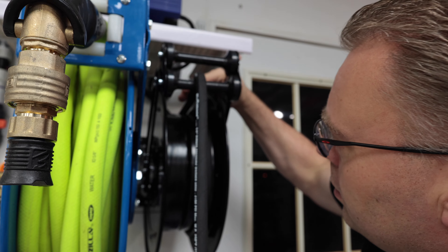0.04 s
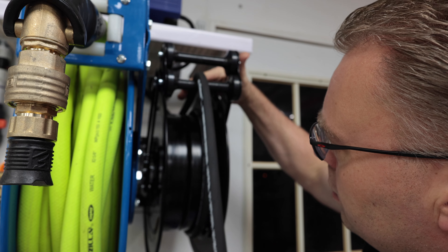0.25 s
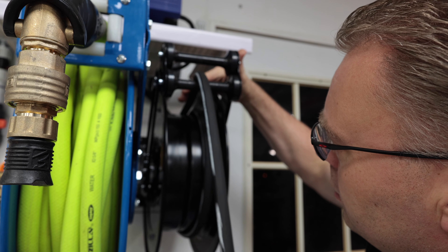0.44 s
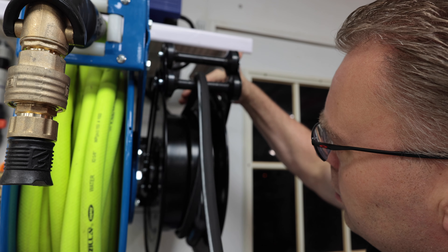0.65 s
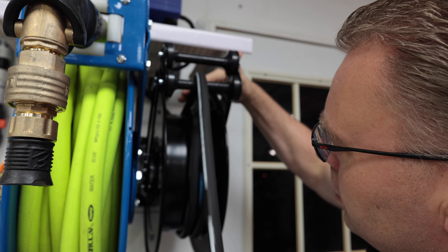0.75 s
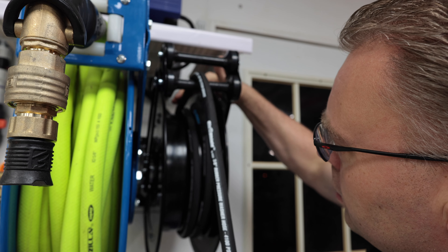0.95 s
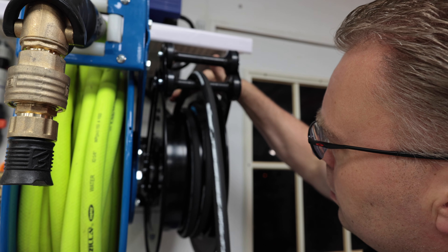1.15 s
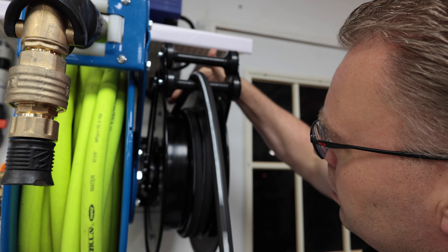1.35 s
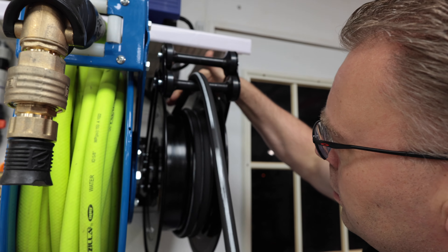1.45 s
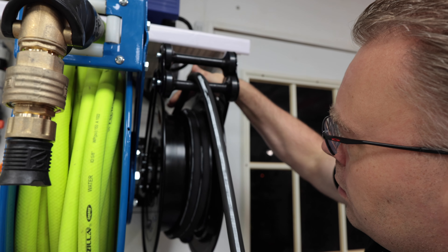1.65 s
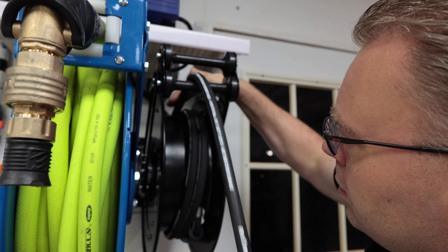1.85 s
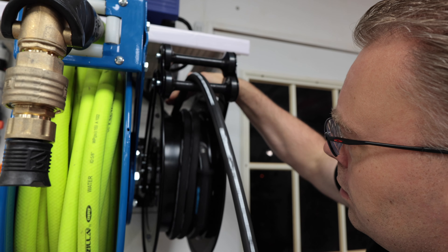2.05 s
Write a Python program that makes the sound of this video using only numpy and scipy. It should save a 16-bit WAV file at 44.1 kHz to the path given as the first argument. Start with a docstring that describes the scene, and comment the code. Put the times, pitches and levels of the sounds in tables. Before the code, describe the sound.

A hose reel ratchets in three quick runs of metallic clicks as it is tugged. The hose rubs and squeaks in its guide, the wall mount thuds, and a low rumble bumps the close microphone in a garage.

```python
"""Ratcheting hose reel

A spring hose reel on a garage wall is pulled in three tugs. Its pawl bounces over the ratchet teeth and
excites the modes of steel latch, drum and side plate; the hose rubs and squeaks in the guide; the mount
thuds. A close microphone also gets a low rumble, rounds the peaks and drops out briefly near the end."""
import sys
import numpy as np
from scipy import signal
from scipy.fft import rfft, irfft
from scipy.io import wavfile
from scipy.ndimage import uniform_filter1d

SR = 44100
rng = np.random.default_rng(int(sys.argv[2]) if len(sys.argv) > 2 else 0)


def output_pcm(signal):
    """Save a mono or channel-first signal as 16-bit PCM at the path in sys.argv[1].

    Samples are clipped to [-1, 1] before scaling.
    """
    pcm = np.clip(np.atleast_2d(signal).T, -1, 1) * 32767
    wavfile.write(sys.argv[1], SR, np.round(pcm).astype(np.int16))


N = 92610

# modes of latch, drum and side plate: pitch_hz, gain_db, t60_s
LATCH_MODES = [(1000, -6, .04), (1965, -8, .06), (2113, -7, .06), (2340, -4, .06), (2500, -10, .04),
               (2796, -5, .06), (2975, -5, .05), (3202, 0, .07), (3660, -5, .04), (4220, -12, .04),
               (4640, -11, .04), (6220, -10, .07), (7480, -24, .035), (9560, -24, .06)]
DRUM_MODES = [(749, -16.5, 0.062), (768, -2.5, 0.04), (833, -11.5, 0.056), (1000, -28.5, .08),
              (1184, -16, 0.097)]
PLATE_MODES = [(1462, -8.5, .08), (1540, -3.5, 0.11), (1526, -20.5, 0.8), (1670, -17.5, 0.16)]


def undb(db):
    return 10 ** (np.asarray(db) / 20)


def level(x, db):
    return x * undb(db) / np.sqrt(np.mean(x ** 2))


def interpolate(table, x, log=False):
    a, b = np.array(table, float).T
    return np.interp(np.log(x + 1), np.log(a + 1), b) if log else np.interp(x, a, b)


def colour(x, spectrum):
    """Minimum-phase filtering to a spectral shape; white noise keeps its power."""
    gain = undb(interpolate(spectrum, np.fft.rfftfreq(4096, 1 / SR), log=True))
    cepstrum = irfft(np.log(level(gain, 0)))
    cepstrum[1:2048] *= 2
    cepstrum[2049:] = 0
    return signal.fftconvolve(x, irfft(np.exp(rfft(cepstrum))))[:N]


def grit(scatter_db):
    """Dense tiny impacts of uneven size make heavy-tailed noise, rms 1."""
    return level(rng.standard_normal(N) * undb(scatter_db * np.minimum(rng.exponential(size=N), 5)), 0)


def walk(rate_hz):
    """Smoothed noise wanders slowly, rms 1."""
    span = int(SR / rate_hz)
    return level(uniform_filter1d(uniform_filter1d(rng.standard_normal(N), span), span), 0)


def ring(push, modes, wander_rad=0):
    """Damped modes, each driven at its own pitch with drifting phase; without wander, by push alone."""
    out = 0
    for hz, db, t60 in modes:
        r = np.exp(-np.log(1000) / (t60 * SR))
        w = 2 * np.pi * hz / SR
        drive = 1
        if wander_rad:
            drive = np.cos(np.cumsum(w + wander_rad * rng.standard_normal(N)) + 2 * np.pi * rng.random())
        out = out + undb(db) * signal.lfilter([np.sin(w)], [1, -2 * r * np.cos(w), r * r], push * drive)
    return out


def bursts(start_s, level_db, attack_ms, width_ms):
    """Envelope of impacts: quick rise, Gaussian fall."""
    t, out = np.arange(N) / SR, np.zeros(N)
    for s, db, width in zip(start_s, level_db, np.broadcast_to(width_ms, start_s.shape)):
        span = slice(int(s * SR), int(s * SR) + 4000)
        age_ms = np.clip(t[span] - s, 0, None) * 1000
        rise = (1 - np.exp(-age_ms / attack_ms)) ** 2
        out[span] += 2 * undb(db) * rise * np.exp(-.5 * (age_ms / width) ** 2)
    return out


def hose():
    """Sliding friction in the guide hisses and forces the steel modes into vibration."""
    rubbing = [(0, -54.5, -59), (0.178, -60.5, -69), (0.298, -49.5, -55), (.37, -44, -45),
               (0.598, -38, -36), (0.719, -47, -46), (.79, -35, -28), (1, -39, -43), (1.2, -53.5, -58.5),
               (1.329, -58.5, -58), (1.401, -50, -63), (1.479, -34, -29.5), (1.68, -38.5, -36),
               (1.8, -52, -52.5), (2.1, -60.5, -78)]  # course of the friction: time_s, hiss_db, drive_db
    spectrum = [(88, -5), (150, -15.5), (383, 0), (475, -3.5), (998, 3), (2650, -11.5), (3220, -6),
                (5460, -19.5), (13700, -34.5), (16000, -75)]  # hiss: frequency_hz, gain_db
    time_s, hiss_db, drive_db = np.array(rubbing).T
    t = np.arange(N) / SR
    hiss, drive = (undb(np.interp(t, time_s, db) + 0.83 * walk(60)) for db in (hiss_db, drive_db))
    modes = LATCH_MODES + DRUM_MODES[3:] + PLATE_MODES[1:2]
    return colour(hiss * grit(3.0), spectrum) + undb(-53.5) * ring(drive, modes, wander_rad=0.11)


def rumble():
    """Buffeting at the microphone: amplitude modulation makes bass noise swell and flutter."""
    swell = [(0.0, -73), (0.16, -102), (0.28, -71), (0.41, -74), (0.51, -71), (1.04, -70), (1.1, -39),
             (1.14, -32), (1.16, -34), (1.33, -48), (1.34, -51), (1.6, -68), (1.63, -37.5), (1.68, -41),
             (1.89, -56.5), (1.96, -50), (2.02, -54.5), (2.1, -65)]  # envelope: time_s, level_db
    spectrum = [(12, -3), (20, 11.5), (123, 7), (189, -13), (233, 2), (313, -24.5), (700, -44), (910, -95),
                (1540, -120)]  # bass noise: frequency_hz, gain_db
    bass = level(colour(rng.standard_normal(N), spectrum), 0)
    return bass * undb(interpolate(swell, np.arange(N) / SR) + 0.73 * walk(38))


def background():
    """Faint stationary noise with spectral peaks near 95 and 1500 Hz."""
    spectrum = [(18, -42), (30, -28.5), (95, 4), (157, -5), (740, -47), (1160, -5), (1350, -26), (1500, 6),
                (1720, -26.5), (3140, -63), (16000, -35)]  # noise floor: frequency_hz, gain_db
    return level(colour(rng.standard_normal(N), spectrum), -71.5)


def mount():
    """Impulsive blows excite the low modes of bracket and wall, which decay freely."""
    thuds = [(.0005, -51, -39, -42.5), (.233, -34.5, -47, -37.5), (.56, -52, -73, -36),
             (0.582, -57.5, -77, -40.5), (0.735, -58, -59, -39.5), (0.77, -38, -56, -36.5),
             (0.962, -51.5, -59, -40.5), (1.32, -58, -62, -51.5), (1.437, -31, -49, -33),
             (1.643, -36.5, -54, -37.5), (2.073, -59, -64, -54.5)]  # blows: start_s, dull_db, hollow_db, knock_db
    # dull and hollow resonances: pitch_hz, gain_db, t60_s
    dull_modes = [(133, 0, .21), (160, -6, .1), (325, -6, .08), (385, -6, .08), (430, -7, .08),
                  (610, -6, .1), (665, -8, .08), (760, -8, .06), (1172, -5, .15), (1600, -10, .05)]
    hollow_modes = [(128, 0, .2), (270, -1, .4), (350, -14, .4), (434, -10, .2), (592, -8, .35),
                    (800, -12, .15), (1170, -13, .3), (1448, -8, .26)]
    spectrum = [(100, -20), (330, 16.5), (800, 5), (2000, -4.5), (4000, -17.5), (12000, -52)]  # impact noise: frequency_hz, gain_db
    start_s, dull_db, hollow_db, knock_db = np.array(thuds).T
    dull = ring(bursts(start_s, dull_db, attack_ms=.1, width_ms=.25), dull_modes)
    hollow = ring(bursts(start_s, hollow_db, attack_ms=.1, width_ms=.25), hollow_modes)
    knock = bursts(start_s, knock_db, attack_ms=1, width_ms=12.6) * rng.standard_normal(N)
    highpass = signal.butter(4, 95, "high", fs=SR, output="sos")
    return signal.sosfilt(highpass, undb(-20) * (dull + hollow) + colour(knock, spectrum))


def squeaks():
    """Friction of the hose in the guide gives short gliding tones that waver in pitch and level."""
    glides = [(0.177, 0.032, 3580, 3620, -59.5), (0.252, .14, 3330, 3055, -49),
              (0.312, 0.039, 960, 1050, -42), (0.335, 0.04, 990, 970, -51),
              (0.694, 0.077, 1120, 1176, -37.5), (1.21, 0.092, 950, 1179, -57),
              (1.33, 0.065, 3200, 3200, -62), (1.338, 0.19, 1135, 960, -48),
              (1.452, .065, 3185, 3200, -27.5), (1.864, .14, 1545, 1514, -53),
              (2.054, .016, 6250, 6200, -46.5)]  # squeaks: start_s, length_s, start_hz, end_hz, level_db
    t, out = np.arange(N) / SR, 0
    waver, flutter = 1 + 0.0084 * walk(130), undb(3.9 * walk(90))
    for start_s, length_s, start_hz, end_hz, db in glides:
        progress = np.clip((t - start_s) / length_s, 0, 1)
        phase = 2 * np.pi * np.cumsum((start_hz + (end_hz - start_hz) * progress) * waver) / SR
        swell = np.sqrt(np.abs(np.sin(np.pi * progress))) * (progress < 1)
        out = out + undb(db) * swell * np.sin(phase)
    return out * flutter


def pawl():
    """Impact excitation: each strike is a burst of bounces that rings the steel and radiates noise."""
    strikes = [(0.32, -43, -37, -53, -89, 6.5), (0.392, -24, -34, -38, -46, 7.1),
               (0.4416, -20, -65, -42, -44, 7), (0.4804, -14, -48, -26, -48, 5.55),
               (0.5156, -13.5, -17, -27.5, -36, 5.73), (0.5535, -35, -20, -33.5, -24.5, 8.7),
               (0.57, -35.5, -21.5, -30, -32.5, 8.2), (0.5834, -39, -32, -65, -35.5, 6.9),
               (0.7343, -26.5, -31, -27.5, -21.5, 6.74), (0.7549, -17, -22, -34, -54, 6.1),
               (0.7823, -27, -33, -58, -64, 12.6), (0.822, -17.5, -24, -34, -31.5, 8.9),
               (0.848, -8.5, -25, -24, -31.5, 6.06), (0.8762, -13, -43, -19.5, -31, 6.5),
               (0.9023, -10, -38, -20, -33, 4.9), (0.9421, -18.5, -23, -24, -61, 3.8),
               (0.9576, -24, -27, -22, -23.5, 6.6), (0.9824, -32, -27, -29.5, -37, 7.9),
               (1.1584, -50, -39.5, -39, -57.5, 7.8), (1.4141, -19.5, -31, -30, -25, 6.1),
               (1.4312, -13.5, -32, -17.5, -30, 5.14), (1.452, -22.5, -25, -33, -34, 4.9),
               (1.4714, -25, -27.5, -47, -54.5, 5.1), (1.4888, -25.5, -39, -27, -68, 5.2),
               (1.5065, -11, -27.5, -20, -29.5, 3.32), (1.53, -19.5, -37, -34.5, -39, 8.7),
               (1.5589, -16, -27.5, -29.5, -37, 6.9), (1.5896, -15.5, -27.5, -24, -44, 7.05),
               (1.6296, -31, -25.5, -28.5, -34, 9.5), (1.6439, -32, -17, -21.5, -29.5, 5.36),
               (1.662, -33.5, -18, -35.5, -30.5, 6.2), (2.0584, -56, -68, -50, -57, 7.6),
               (2.069, -39, -45, -53.5, -61, 4.8)]  # pawl on teeth: start_s, latch_db, drum_db, plate_db, crack_db, width_ms
    crack_modes = [(8570, -3, .04), (9000, -3, .04), (10650, -3, .05), (11400, -6, .04), (12400, -8, .04)]  # treble resonances: pitch_hz, gain_db, t60_s
    # broad and treble impact noise: frequency_hz, gain_db
    clack_spectrum = [(120, -80), (200, -23.5), (968, 8.5), (1840, -6), (2290, 7), (3190, 10.5), (3970, -1),
                      (6280, -4.5), (16000, -46.5)]
    crack_spectrum = [(3000, 18), (5500, 7.5), (9000, 10.5), (13000, 6.5), (16000, -6.5)]
    lead_s, attack_ms, wander_rad, scatter_db = .0025, 2.2, .09, 2.5
    start_s, *drives_db, width_ms = np.array(strikes).T
    latch, drum, plate, crack = (bursts(start_s - lead_s, db, attack_ms, width_ms) for db in drives_db)
    return (undb(-51.5) * ring(latch, LATCH_MODES, wander_rad)
            + undb(-41.5) * ring(drum, DRUM_MODES, wander_rad)
            + undb(-41.5) * ring(plate, PLATE_MODES, wander_rad)
            + undb(-55) * ring(crack, crack_modes, wander_rad)
            + undb(-6.5) * colour(latch * grit(scatter_db), clack_spectrum)
            + undb(1.5) * colour(crack * grit(scatter_db), crack_spectrum))


def ping():
    """Resonance of a small steel part adds a thin, very high ring to three strikes."""
    strikes = [(.555, -35), (.957, -33), (1.636, -27)]  # excitations: start_s, drive_db
    modes = [(13570, 0, .08), (13640, -14, .2)]  # close pair of modes: pitch_hz, gain_db, t60_s
    start_s, drive_db = np.array(strikes).T
    return undb(-40) * ring(bursts(start_s, drive_db, attack_ms=2.5, width_ms=6), modes, wander_rad=.04)


def flaps():
    """Short noise transients in the upper bass flap softly on top of the rumble."""
    pulses = [(1.076, 12.5, -43.5), (1.157, 13.7, -31.5), (1.179, 17, -44), (1.62, 15, -42.5)]  # flaps: start_s, width_ms, level_db
    spectrum = [(40, -29), (110, 0), (250, 3.5), (450, -16), (900, -33), (4000, -67.5)]  # flap noise: frequency_hz, gain_db
    start_s, width_ms, level_db = np.array(pulses).T
    envelope = bursts(start_s, level_db, attack_ms=3.9, width_ms=width_ms)
    return colour(envelope * rng.standard_normal(N), spectrum)


def room(x):
    """Diffuse reverberation: each octave of a noise tail decays exponentially at its own rate."""
    decay = [(100, 0.62), (1000, 0.2), (4000, 0.41), (16000, 0.1)]  # garage reverberation: lookup_hz, t60_s
    t, tail = np.arange(SR) / SR, 0
    for low_hz in 64.7 * 2 ** np.arange(8.):
        octave = signal.butter(2, [low_hz, 2 * low_hz], "band", fs=SR, output="sos")
        t60_s = interpolate(decay, 0.48 * low_hz, log=True)
        tail = tail + signal.sosfilt(octave, rng.standard_normal(SR)) * undb(-60 * t / t60_s)
    tail *= 1 - np.exp(-t / 0.0027)  # reflections build up
    return signal.fftconvolve(x, tail * undb(-16) / np.sqrt(np.sum(tail ** 2)))[:N]


def scene():
    """Superposition in mono; only the reel reverberates."""
    reel = pawl() + ping() + mount() + hose() + squeaks()
    return (reel + room(reel) + rumble() + flaps() + background())[None]


def record(dry):
    """Soft saturation rounds the peaks, the signal drops out briefly, a low-pass cuts the top."""
    limit, top_hz = undb(-13.5), 16000
    off_s, on_s, fade_s = 1.995, 2.049, 0.004
    t = np.arange(N) / SR
    gate = np.clip(np.maximum(off_s - t, t - on_s) / fade_s, 0, 1)
    lowpass = signal.ellip(10, .2, 80, top_hz, fs=SR, output="sos")
    return signal.sosfilt(lowpass, limit * np.tanh(dry / limit) * gate)


dry = scene()
out = record(dry)
output_pcm(out)
```